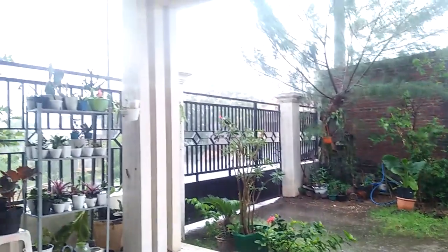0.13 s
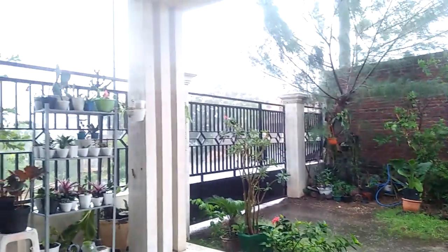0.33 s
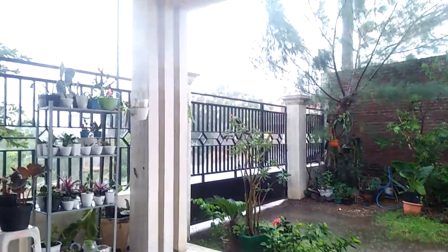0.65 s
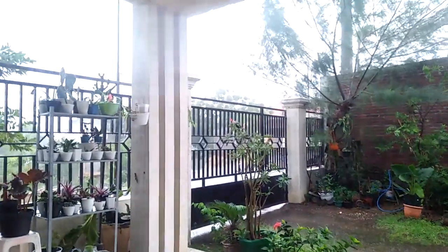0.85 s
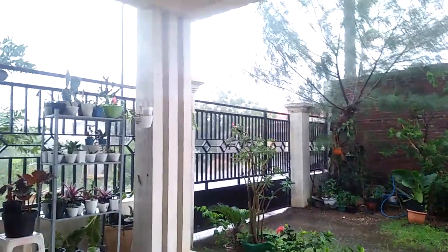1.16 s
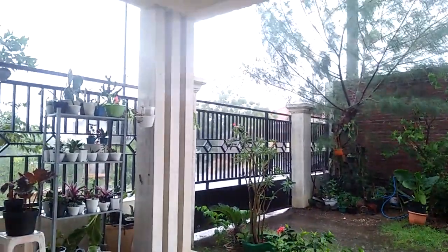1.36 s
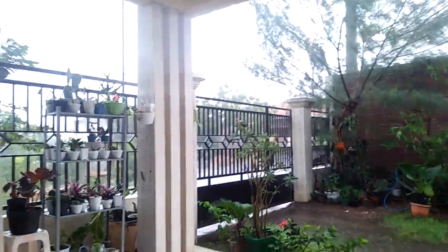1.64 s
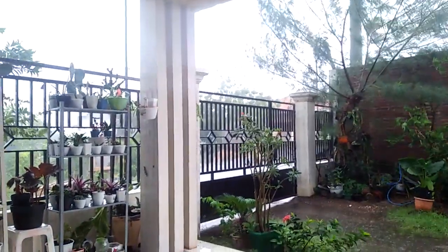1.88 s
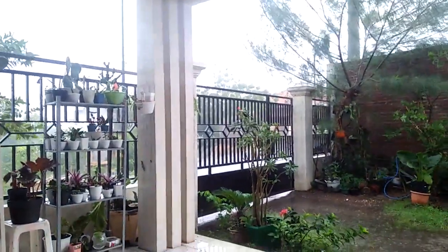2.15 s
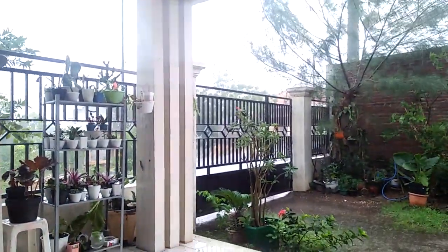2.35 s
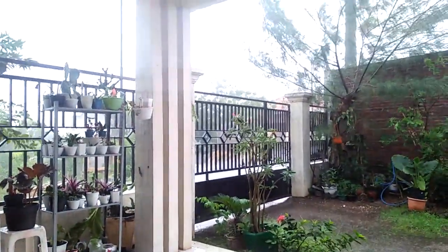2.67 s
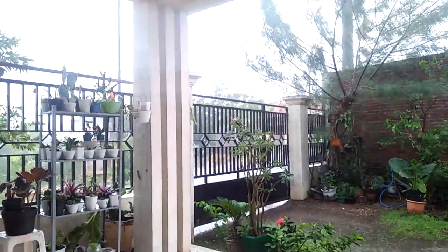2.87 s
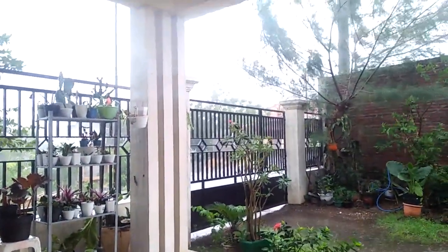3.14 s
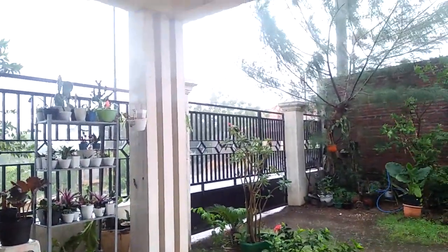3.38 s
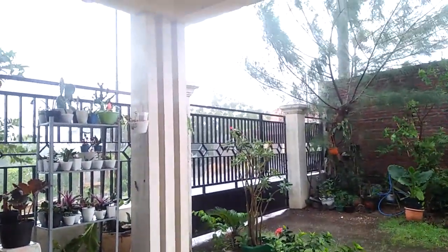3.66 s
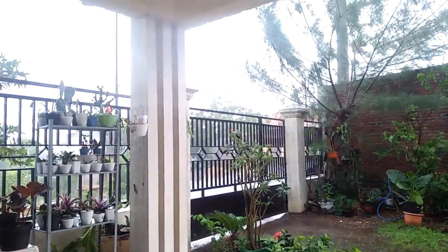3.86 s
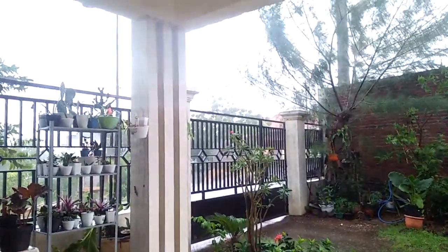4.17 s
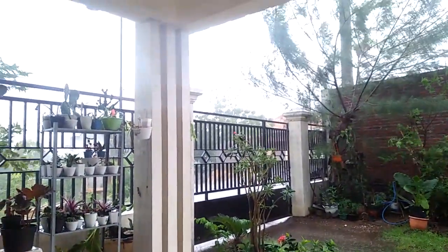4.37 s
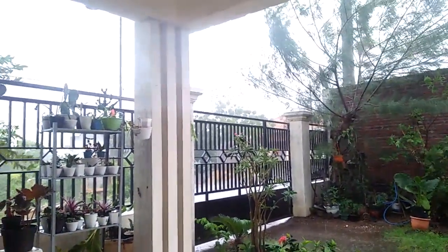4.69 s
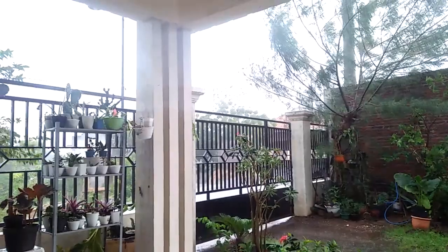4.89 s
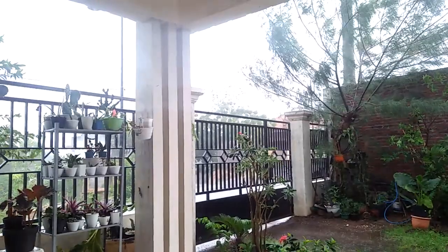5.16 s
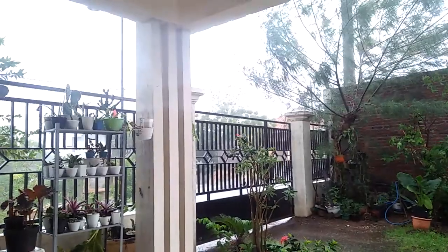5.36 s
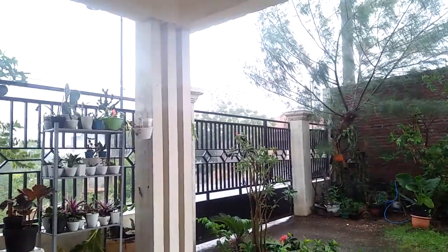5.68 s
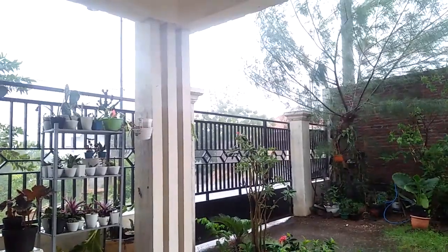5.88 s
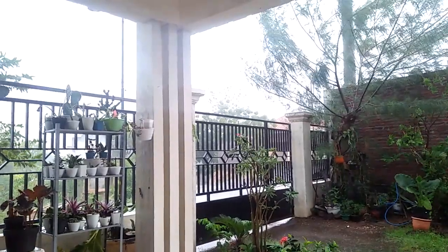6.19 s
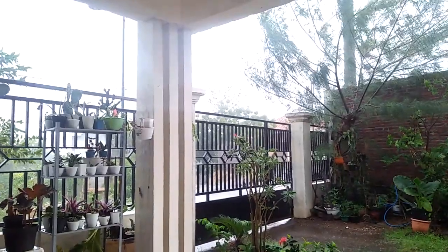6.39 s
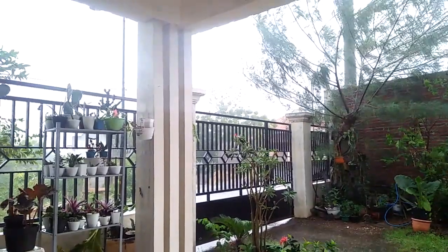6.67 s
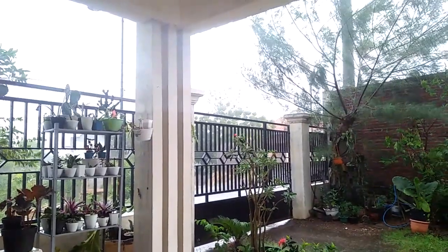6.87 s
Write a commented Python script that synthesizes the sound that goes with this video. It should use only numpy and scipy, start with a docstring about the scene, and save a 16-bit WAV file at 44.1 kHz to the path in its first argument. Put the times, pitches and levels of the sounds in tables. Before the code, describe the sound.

Steady rain falls on a wet yard, heard from beneath a terrace roof. A bright hiss flickers over low patter, with spills from eaves and leaves, puddle drips and tile spatters. Just after four seconds, four dull knocks sound close to the microphone as the treble dips; around five seconds wind buffets it with low thumps, and again more lightly near the end.

```python
"""Steady rain on a puddled yard, heard from under the roof of a tiled terrace: three ranges of random ticks
over noise merge into a hiss, coloured, combed by a roof echo and flickering. Splashes from eaves and leaves and
a soft bump close by, spatters on the tiles, drips and ringing trickles are bands of droplet noise. Dull knocks
close by are pressure wiggles with a thud, crack and ring, while the treble sinks. Now and then wind buffets the
microphone as low noise and thumps; a filtered-noise rumble lies below."""
import sys
import numpy as np
from scipy import signal
from scipy.fft import rfft, irfft, next_fast_len
from scipy.io import wavfile

SR = 44100
rng = np.random.default_rng(int(sys.argv[2]) if len(sys.argv) > 2 else 0)


def persist_wave(psi):
    """Save psi, clipped to +-1, as 16-bit WAV."""
    counts = np.round(np.clip(psi, -1, 1) * 32767).astype(np.int16)
    wavfile.write(sys.argv[1], SR, np.atleast_2d(counts).T)


N = 310023
TIME = np.arange(N) / SR
TOP_HZ = 14210

# low patter of big drops, before its trim: (time [s], level [dB])
PATTER = [(0.0, -47), (0.31, -48.5), (0.68, -45.5), (1.62, -48.5), (2.35, -45.5), (3.27, -49), (3.62, -47),
          (3.89, -49.5), (4.34, -44.5), (4.6, -53), (6.54, -49.5), (7.03, -47.5)]


def undb(db):
    """Decibels to gain."""
    return 10 ** (np.asarray(db) / 20)


def unit(x):
    """Scale to an rms of 1."""
    return x / np.sqrt(np.mean(x ** 2))


def decay(t, t60):
    """Exponential fade that loses 60 dB in t60 seconds."""
    return np.exp(-np.log(1000) * t / t60)


def shape(x, response):
    """Filter by a response given as a function of frequency."""
    size = next_fast_len(x.shape[-1] + 1024)
    hz = np.maximum(np.arange(size // 2 + 1) * SR / size, 1)
    return irfft(rfft(x, size) * response(hz), size)[..., :x.shape[-1]]


def colour(hz, points):
    """Gain of a (frequency [Hz], level [dB]) table on a log-frequency axis."""
    at, db = np.transpose(points)
    return undb(np.interp(np.log(hz), np.log(at), db))


def bell(hz, centre_hz, octaves):
    """A rounded band around a centre."""
    return np.exp(-.5 * (np.log2(hz / centre_hz) / octaves) ** 2)


def walk(rate, size=N):
    """Random wander with a spread near 1, heading for a new value rate times a second."""
    knots = rng.standard_normal(2048)
    # straight lines between knots shrink the spread; the root restores it
    return np.interp(TIME[:size] * rate, np.arange(len(knots)), knots) * np.sqrt(3 / 2)


def add(out, s, sound):
    """Mix a sound in from time s on."""
    start = int(np.clip(s * SR, 0, N - 1))
    part = sound[..., :N - start]
    out[..., start:start + part.shape[-1]] += part


def droplets(size, per_s, spread_db, share):
    """Mid and side of white rain: ticks of uneven size and place, over the blur of far ones."""
    falls = rng.random(size) < per_s / SR
    signs = np.sign(rng.standard_normal(size))
    sizes = undb(spread_db * np.minimum(rng.exponential(size=size), 5))
    ticks = falls * signs * sizes
    place = np.stack([np.ones(size), rng.uniform(-1, 1, size) * np.sqrt(3)])
    share = np.clip(share, 0, 1)  # part of the power that the ticks carry
    blur = rng.standard_normal((2, size))
    return np.sqrt(share) * unit(ticks) * place + np.sqrt(1 - share) * blur


def roof_echo(hz, lag_s=0.00666, strength=0.69, dull_hz=850):
    """The terrace roof returns the lows a moment later and combs them."""
    echo = np.clip(strength, 0, .9) / (1 + (hz / dull_hz) ** 3)
    return (1 + echo * np.exp(-2j * np.pi * hz * lag_s)) / np.sqrt(1 + echo ** 2)


def rain(flicker_db=1.55, flicker_rate=35):
    """Big drops patter low, small ones spray high; each range swells and flickers by itself."""
    # centres of the patter, splatter and fine spray: [Hz]
    range_centres = [900, 3000, 8000]
    # tonal balance of the merged rain: (frequency [Hz], relative level [dB])
    rain_colour = [(120, -100), (230, -92), (450, -86), (600, -86), (900, -78), (1170, -85), (2750, -84),
                   (3400, -89), (4900, -92), (8400, -84), (13500, -90.5)]
    # splatter of middling drops, before its trim: (time [s], level [dB])
    splatter = [(0.0, -47.5), (0.23, -53.5), (1.11, -50), (1.21, -48.5), (1.55, -48.5), (2.31, -54.5),
                (2.47, -48.5), (2.6, -54), (3.37, -51.5), (3.54, -49.5), (4.32, -54.5), (4.68, -57),
                (4.95, -47.5), (5.07, -48.5), (5.21, -61.5), (6.07, -50.5), (6.32, -56.5), (7.03, -52.5)]
    # fine spray, one part before and one after the knocks: (time [s], level [dB])
    fine_spray = [
        [(0.0, -41), (1.07, -43.5), (1.39, -41), (1.91, -53), (2.66, -39), (2.78, -45), (3.32, -46),
         (3.74, -45), (3.95, -57)],
        [(4.55, -53), (4.67, -40.5), (4.92, -40.5), (5.04, -46.5), (5.74, -45), (6.01, -55), (6.24, -47.5),
         (6.68, -50.5), (7.03, -44.5)],
    ]
    curves = PATTER, splatter, np.concatenate(fine_spray)
    trims_db = 0.5, -1.0, 0.0
    out = 0
    for curve, trim_db, own, range_hz in zip(curves, trims_db, np.eye(len(curves)), range_centres):
        def response(hz):
            # neighbouring ranges crossfade in power
            band = np.sqrt(np.interp(np.log(hz), np.log(range_centres), own))
            return band * colour(hz, rain_colour) * roof_echo(hz)

        # the smaller the drops, the more of them fall
        drops = droplets(size=N, per_s=.6 * range_hz, spread_db=2.0, share=0.38)
        drops = shape(drops, response)
        level_db = np.interp(TIME, *np.transpose(curve)) + trim_db
        out = out + unit(drops) * undb(level_db + flicker_db * walk(flicker_rate))
    return out


def rumble(waver_db=3.0, rate=18):
    """A faint, restless rumble from far off lies under the rain."""
    # spectrum before the waver: (frequency [Hz], level [dB per Hz])
    rumble_colour = [(22, -104), (40, -80), (62, -72), (105, -85), (170, -81.5), (240, -93.5), (330, -99),
                     (420, -110)]
    white = rng.standard_normal(N) * np.sqrt(SR / 2)  # 0 dB per Hz
    far = shape(white, lambda hz: colour(hz, rumble_colour))
    return far * undb(waver_db * walk(rate))


def splash(hz, octaves, db, rise, t60, sputter_db=1.4, sputter_rate=70):
    """One splash throws up a cloud of droplets that gathers quickly and thins out in spurts."""
    t = TIME[:SR * 2 // 3]
    cloud = droplets(size=len(t), per_s=0.66 * hz, spread_db=1.5, share=0.7)
    cloud = shape(cloud, lambda f: bell(f, hz, octaves))
    cloud = cloud * undb(sputter_db * walk(sputter_rate, size=len(t)))
    swell = np.minimum(t / rise, 1) * decay(np.maximum(t - rise, 0), t60)
    return unit(cloud) * swell * undb(db)


def splashes(body_t60=0.52, spray_octaves=0.64, spray_t60=0.89):
    """Each splash lands with a pitched body and throws up a bright spray that lingers a little longer."""
    # splashes, mostly water from eaves and leaves, one (4.442 s) a soft bump close by: (time [s], rise [s], #
    # body pitch [Hz], body width [octaves], body level [dB], spray centre [Hz], spray level [dB])
    splash_table = [(.09, 0.038, 3200, 0.27, -41.5, 9000, -39), (.459, 0.012, 2270, 0.67, -40.5, 8400, -36),
                    (0.699, 0.041, 1790, 0.24, -42.5, 6230, -43),
                    (1.166, 0.053, 2440, 0.65, -41, 8600, -38.5),
                    (1.402, 0.023, 2580, 0.39, -40.5, 8400, -37.5),
                    (1.579, 0.045, 4170, 0.71, -43, 8000, -48), (1.70, 0.061, 2130, 0.21, -46, 8800, -39.5),
                    (1.838, 0.0062, 2970, 0.24, -43.5, 9000, -60),
                    (1.994, 0.0091, 1680, .25, -43, 8200, -39), (2.07, 0.022, 6700, .27, -38.5, 9200, -39),
                    (2.135, 0.018, 4400, 0.92, -36.5, 8500, -56),
                    (2.335, 0.029, 1770, 0.1, -43.5, 9000, -41), (2.573, .017, 2600, 0.61, -34, 8800, -37.5),
                    (2.94, 0.013, 4640, 0.25, -50.5, 8500, -62), (3.022, .04, 2500, 0.22, -44.5, 9850, -42),
                    (3.378, 0.027, 4450, 0.91, -40.5, 9500, -34.5),
                    (3.559, 0.038, 1990, 0.5, -35.5, 8000, -39), (3.72, 0.027, 850, .5, -51, 12000, -35),
                    (3.795, 0.011, 1610, 0.13, -38, 8070, -33.5), (3.982, 0.049, 4600, 0.33, -42, 8100, -57),
                    (4.442, 0.018, 1130, 0.77, -39, 8000, -48.5),
                    (4.475, .025, 2710, 0.28, -41.5, 7360, -42), (4.562, 0.02, 3950, 1, -40, 8500, -46),
                    (4.63, 0.047, 5640, 0.2, -43, 8500, -49.5), (4.734, 0.07, 6470, 0.15, -38, 8500, -40),
                    (4.865, 0.034, 1494, 0.16, -40.5, 8650, -31.5),
                    (5.245, 0.045, 5760, 0.47, -53, 8200, -40), (5.464, 0.028, 5860, 0.59, -42, 7850, -42),
                    (5.757, .012, 3370, 0.17, -46.5, 7700, -42), (5.906, 0.01, 1450, .2, -44, 7300, -41),
                    (5.98, .005, 4660, 0.22, -45, 7500, -54), (6.133, 0.018, 4250, .22, -41, 8700, -44.5),
                    (6.207, .006, 4940, 0.55, -43.5, 8500, -48), (6.644, 0.028, 4500, 1, -45.5, 7560, -46),
                    (7.006, 0.018, 1820, 0.2, -36, 8160, -38.5)]
    out = np.zeros((2, N))
    for s, rise, hz, octaves, body_db, spray_hz, spray_db in splash_table:
        add(out, s, splash(hz, octaves, body_db, rise, body_t60))
        add(out, s, splash(spray_hz, spray_octaves, spray_db, rise, spray_t60))
    return out


def spats():
    """A heavy drop on the tiles bursts into a short, bright spatter."""
    # bursts on the tiles: (time [s], level [dB])
    spat_table = [(0.172, -31.5), (1.947, -30), (3.099, -31), (5.846, -37)]
    out = np.zeros((2, N))
    for s, db in spat_table:
        add(out, s, splash(hz=8800, octaves=0.31, db=db, rise=0.0043, t60=.13))
    return out


def patchy(x, count=18, from_hz=550, depth_db=2.25, rate=34):
    """Water falls in clumps of like-sized drops, so each strip above the lowest flickers alone."""
    centres = np.geomspace(from_hz, TOP_HZ, count)
    strips = [shape(x, lambda hz: np.interp(hz, centres, own)) for own in np.eye(count)]
    return strips[0] + sum(strip * undb(depth_db * walk(rate)) for strip in strips[1:])


def drips(count=130, low_hz=700, high_hz=3000, octaves=0.045, under_patter_db=-4.0, spread_db=3.5, t60=0.22):
    """Watery, narrow-pitched drips in the puddles: a few loud, many small that grow with the patter."""
    # the loudest drips: (time [s], pitch [Hz], level [dB])
    loud_drips = [(.465, 2050, -37.5), (.794, 810, -49), (1.155, 2530, -45), (2.002, 3020, -38.5),
                  (2.132, 1490, -35.5), (2.483, 1240, -41), (2.699, 2330, -40.5), (2.83, 2470, -43),
                  (3.70, 870, -43), (4.077, 1330, -43), (5.051, 1077, -35), (5.055, 1890, -41.5),
                  (5.891, 4660, -42.5)]
    out = np.zeros((2, N))
    for s, hz, db in loud_drips:
        add(out, s, splash(hz, octaves=0.11, db=db, rise=0.0066, t60=0.31))
    s, patter_db = np.transpose(PATTER)
    for when, pitch, strength in rng.random((count, 3)) * [N / SR, 1, 1]:
        hz = low_hz * (high_hz / low_hz) ** pitch
        extra_db = spread_db * min(-np.log(1 - strength), 2)
        db = np.interp(when, s, patter_db) + under_patter_db + extra_db
        add(out, when, splash(hz, octaves, db, 0.0026, t60))
    return out


def rings():
    """A trickle sets a flowerpot or railing ringing: a very narrow band, always on the same note."""
    # ringing trickles: (time [s], level [dB])
    ring_table = [(1.578, -43), (2.518, -42.5), (4.958, -54), (5.861, -45), (6.551, -49.5)]
    out = np.zeros((2, N))
    for s, db in ring_table:
        add(out, s, splash(hz=2900, octaves=0.032, db=db, rise=0.016, t60=.7))
    return out


def pop(t, hz, cycles):
    """A brief pressure wiggle under a rounded envelope, centred on t = 0."""
    return np.cos(2 * np.pi * hz * t + np.pi / 4) * np.exp(-.5 * (t * hz / cycles) ** 2)


def wind(flutter_db=2.5, flutter_rate=28, thump_cycles=0.27, attack_s=.07, gust_t60=0.46):
    """Eddies flutter on the microphone as gusts build, hold and die; single thumps of air join them."""
    # gusts: (time of full force [s], hold [s], level [dB])
    gust_table = [(3.5, 0.22, -51), (4.978, 0.038, -41.5), (5.1, .17, -37.5), (5.572, .03, -44),
                  (5.906, .02, -44.5), (6.7, 0.079, -38.5), (6.886, 0.21, -43)]
    # tonal balance of the buffeting: (frequency [Hz], relative level [dB])
    gust_colour = [(20, -30), (40, -5), (65, 8), (130, -8.5), (300, -22), (400, -32), (900, -71)]
    # single low thumps of air: (time [s], pitch [Hz], level [dB])
    thump_table = [(4.463, 190, -30.5), (5.093, 157, -24), (5.104, 111, -34), (5.142, 100, -19.5),
                   (5.184, 121.4, -24), (5.208, 103, -25), (5.252, 133, -26.5), (5.288, 76, -23.5),
                   (6.718, 68, -27), (6.798, 118, -28.5)]
    eddies = unit(shape(rng.standard_normal(N), lambda hz: colour(hz, gust_colour)))
    force = 0
    for s, hold, db in gust_table:
        build = np.clip(1 + (TIME - s) / attack_s, 0, 1)
        force = force + undb(db) * build * decay(np.maximum(TIME - s - hold, 0), gust_t60)
    out = eddies * force * undb(flutter_db * walk(flutter_rate))
    t = TIME[:SR // 10] - .05
    for s, hz, db in thump_table:
        add(out, s + t[0], undb(db) * pop(t, hz, thump_cycles))
    return out


def dulled(x, above_hz=5700, dull_db=-14, steepness=17.0):
    """Around the knocks the treble of the rain sinks slowly, then comes back almost at once."""
    # at 4.48 s most of the depth goes in one step, the rest within 10 ms
    depth = np.interp(TIME, [3.93, 4.48, 4.48, 4.49], [0, 1, 2 / 7, 0])
    lows = shape(x, lambda hz: 1 / (1 + (hz / above_hz) ** steepness))
    return lows + (x - lows) * undb(dull_db * depth)


def knocks(lead_s=0.00626, thud_s=0.0012, click_cycles=0.41, ring_t60=0.039,
           crack_hz=4500, crack_db=-32, crack_t60=0.096):
    """A soft thud, a moment later a snap with a faint crack, then a short dull ring."""
    # dull knocks close by: (time [s], snap pitch [Hz], snap level [dB], thud level [dB], ring level [dB])
    knock_table = [(4.1528, 800, -24, -30.5, -29), (4.1885, 1080, -15.5, -28.5, -26),
                   (4.3374, 920, -11.5, -26.5, -28), (4.3675, 1890, -11, -33, -29)]
    out, before = np.zeros(N), .015  # room ahead of the snap [s]
    t = TIME[:SR // 8] - before
    for s, hz, db, thud_db, ring_db in knock_table:
        push = (t + lead_s) / thud_s
        thud = -2 * push * np.exp(-push ** 2)
        ring = unit(shape(rng.standard_normal(len(t)), lambda f: bell(f, 770, 1.0)))
        ring = ring * np.clip(t * hz, 0, 1) * decay(np.abs(t), ring_t60)
        crack = unit(shape(rng.standard_normal(len(t)), lambda f: bell(f, crack_hz, 1.3)))
        crack = crack * np.clip(1 + t / lead_s, 0, 1) * decay(np.abs(t), crack_t60)
        snap = pop(t, hz, click_cycles) + undb(crack_db) * crack
        add(out, s - before, undb(thud_db) * thud + undb(db) * snap + undb(ring_db) * ring)
    return out


def scene():
    """Knocks, wind and rumble sit in the middle; the treble of the water spreads to both sides."""
    # stereo width of the water: (frequency [Hz], gain of the side signal [dB])
    side_width = [(3000, -75), (3800, -55), (4250, -64), (5800, -12), (8200, -4), (14000, -3.5)]
    falling = patchy(rain() + splashes() + spats())
    mid, side = dulled(falling + drips() + rings())
    mid = mid + knocks() + wind() + rumble()
    side = shape(side, lambda hz: colour(hz, side_width))
    return np.stack([mid + side, mid - side])


def record(dry, low_cut_hz=40):
    """The phone drops the deepest bass and cuts the top steeply."""
    thin = shape(dry, lambda hz: 1 / np.sqrt(1 + (low_cut_hz / hz) ** 6))
    return signal.sosfilt(signal.ellip(12, .1, 80, TOP_HZ, fs=SR, output="sos"), thin)


dry = scene()
out = record(dry)
persist_wave(out)
```